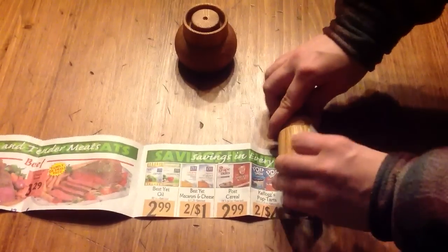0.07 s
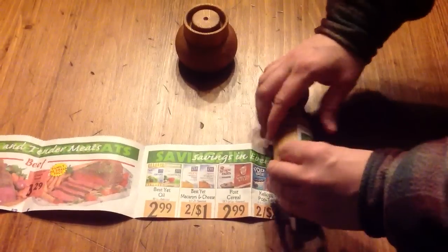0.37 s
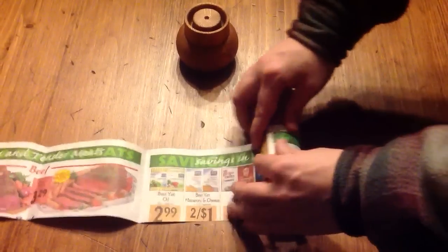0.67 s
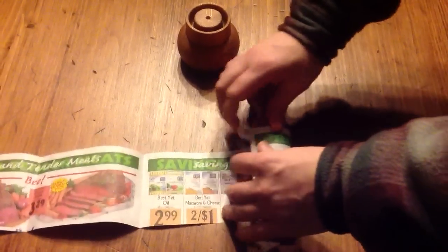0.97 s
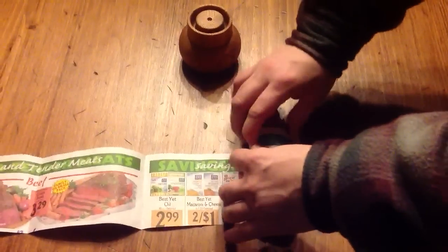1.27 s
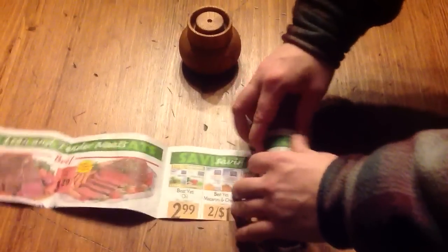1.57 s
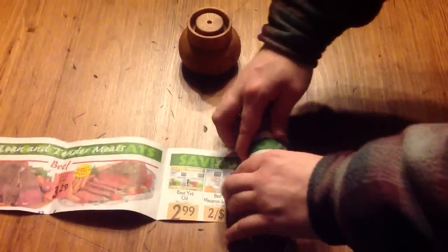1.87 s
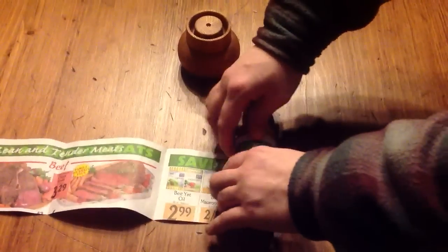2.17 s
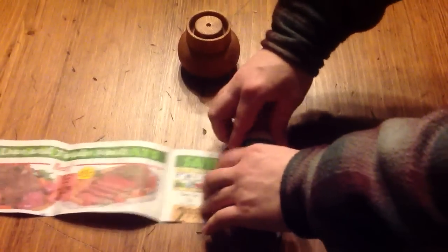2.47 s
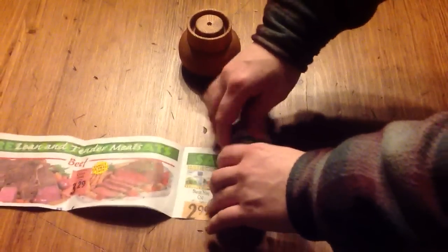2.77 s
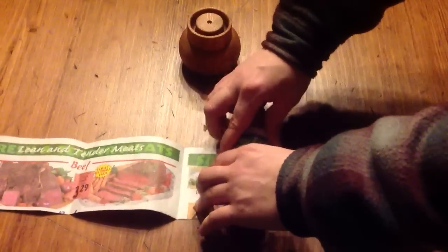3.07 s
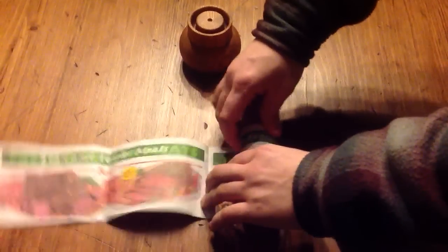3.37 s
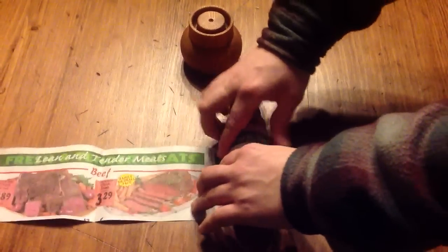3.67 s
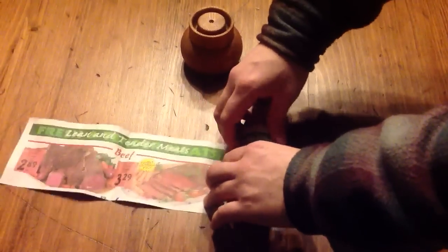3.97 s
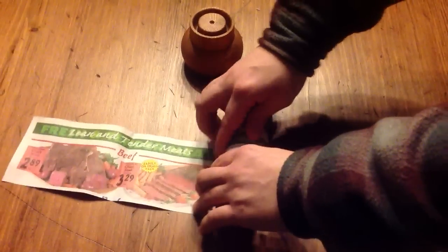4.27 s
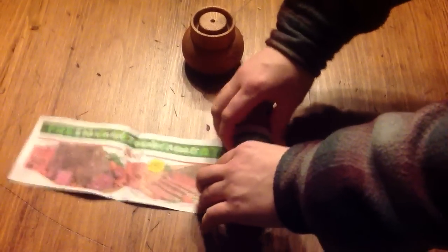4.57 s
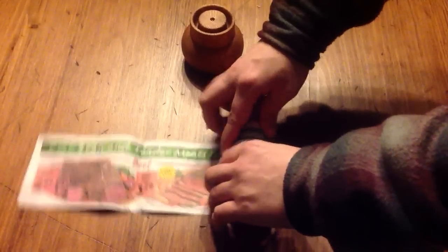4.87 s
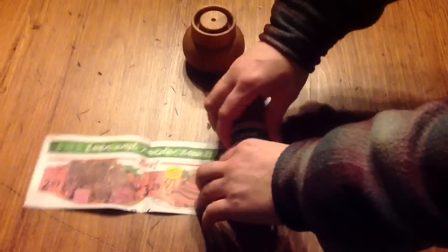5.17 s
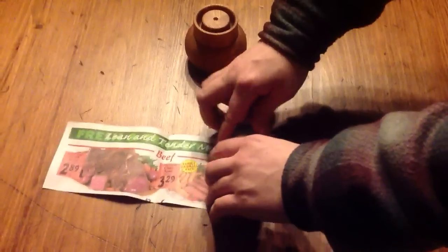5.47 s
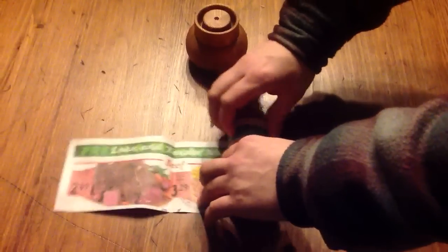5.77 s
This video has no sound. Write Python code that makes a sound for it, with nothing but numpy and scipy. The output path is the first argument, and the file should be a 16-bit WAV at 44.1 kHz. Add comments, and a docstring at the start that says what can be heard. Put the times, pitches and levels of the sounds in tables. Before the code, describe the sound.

A strip of newspaper is rolled by hand around a wooden roller on a wooden table. From the start, the paper rubs and rustles softly in short, irregular pulls, with small snaps as creases give way. At about 1.1 seconds the roller's bare end gives one sharp, dry click, followed by a brief, dull drag around 1.5 seconds. From about 2 seconds the wrapped roller bumps the table softly between rustles, with a crisper paper snap near 3.2 seconds and a quick cluster of bumps near 3.8. At about 4.1 seconds comes one hard knock, the loudest sound, and the tabletop rings for roughly half a second. Rustling, faint dragging and muffled bumps continue until the end at about 6 seconds. The room is small and quiet, with a low hiss and the faint hum of a distant appliance.

```python
"""In a quiet room, two hands roll a strip of newspaper round a wooden pot maker on a wooden table.
From the start the strip rubs and rustles in short pulls, and now and then a crease snaps.
After a second the roller's bare end taps once. Then the paper-wrapped roller drags over the table
and bumps it softly as the grip changes. At four seconds it knocks hard and makes the table ring;
the rustling, soft bumps and dragging go on to the end."""
import sys
import numpy as np
from scipy import signal
from scipy.fft import rfft, irfft
from scipy.io import wavfile
from scipy.ndimage import uniform_filter1d

SR = 44100
rng = np.random.default_rng(int(sys.argv[2]) if len(sys.argv) > 2 else 0)


def inscribe(sig):
    """Save sig as 16-bit PCM at rate SR to the path in sys.argv[1].

    A 1-D sig is mono; a 2-D sig holds one channel per row.
    Samples are clipped to [-1, 1] before scaling.
    """
    pcm = np.round(np.clip(np.atleast_2d(sig).T, -1, 1) * 32767)
    wavfile.write(sys.argv[1], SR, pcm.astype(np.int16))


N = 265041
TIME = np.arange(N) / SR
KNOCK_S, KNOCK_DB = 4.0803, -16.5  # the one hard knock

# the blur of many tones that table and room ring with: f/Hz, level/dB per Hz
RING_SPECTRUM = [(40, -30), (95, -18), (125, -18), (230, 3), (350, -6), (500, -3), (700, 4.5), (950, 1),
                 (1400, 2), (1800, -14), (2400, -12), (3200, -26), (9000, -19.5)]


def undb(db):
    """Turn decibels into a factor to multiply by."""
    return 10 ** (np.asarray(db) / 20)


def unit(x):
    """Scale a signal to an average (rms) size of 1."""
    return x / np.sqrt(np.mean(x ** 2))


def along(hz, points):
    """Read between (f/Hz, value) points, with every octave equally wide."""
    f, value = np.transpose(points)
    return np.interp(np.log(np.maximum(hz, 1)), np.log(f), value)


def colour(x, points):
    """Turn a sound's frequencies up or down to follow (f/Hz, level/dB) points."""
    hz = np.linspace(0, SR / 2, len(x) // 2 + 1)
    return irfft(rfft(x) * undb(along(hz, points)), len(x))


def band(x, hz, kind, order=2):
    """Keep the lows, the highs or a band; a higher order cuts more steeply."""
    return signal.sosfilt(signal.butter(order, np.clip(hz, 20, .45 * SR), kind, fs=SR, output="sos"), x)


def add(out, s, x):
    """Mix x into out, starting at s seconds."""
    i = int(s * SR)
    out[i:i + len(x)] += x[:len(out) - i]


def wander(rate):
    """A curve of size about 1 that glides to a new random value `rate` times a second."""
    hold = int(SR / rate)
    steps = np.repeat(rng.standard_normal(N // hold + 1), hold)
    return unit(uniform_filter1d(steps, hold)[:N])


def fade(t, t60):
    """Die away by 60 dB in t60 seconds."""
    return np.exp(-np.log(1000) * t / t60)


def room_tone(air_db=-61.6, waver=0.00308):
    """Steady air and hiss, with the faint wavering hum of a far appliance."""
    # the room's steady noise: f/Hz, level/dB per Hz
    air_spectrum = [(18, -69), (30, -47), (123, -11.5), (218, -0.5), (652, -9), (724, -10), (869, -12.5),
                    (1070, -6.5), (1250, -12), (1460, -12.5), (1580, -15), (2110, -15), (2670, -18),
                    (15300, -20.5)]
    # the appliance's tones: f/Hz, level/dB
    hum_tones = [(360.7, -73), (721.4, -79), (1200, -78.5), (1437, -75.5)]
    out = unit(colour(rng.standard_normal(N), air_spectrum)) * undb(air_db)
    for hz, db in hum_tones:
        cycles = np.cumsum(hz * (1 + waver * wander(12))) / SR
        out += undb(db) * np.sqrt(2) * np.sin(2 * np.pi * cycles)
    return out


def fibres(rate, spread_db):
    """Tiny slips of paper fibres, about `rate` a second, some larger than the rest."""
    size = undb(spread_db * np.minimum(rng.exponential(size=N), 5))
    return unit(rng.standard_normal(N) * size * (rng.random(N) < rate / SR))


def pull(start_s, length_s, speed_power=1.08, sag_db_per_s=3):
    """Loudness of one pull: it gathers speed, slackens a little, then runs out."""
    t = np.maximum(TIME - start_s, 0)
    rise_s, release_s = 0.024 + 0.27 * length_s, 0.014 + 0.35 * length_s
    speed = np.minimum(t / rise_s, 1)
    release = np.exp(-np.maximum(t - length_s, 0) / release_s)
    return speed ** speed_power * undb(-sag_db_per_s * t) * release


def rustle(rasp_db=-4.0, middle_db=-0.35, hiss_db=-2.0, catch_db=1.26):
    """The strip rubs: loose paper rasps low, tight layers hiss high, and the slide keeps catching."""
    # pulls of the hands: start/s, length/s, level/dB, tightness/dB (extra hiss; negative when loose)
    pulls = [(0, 0.045, -61, 0), (0.124, 0.066, -69.5, -7), (0.539, 0.041, -55.5, 3.5),
             (0.588, 0.13, -63, -0.5), (0.782, 0.037, -57.5, 0.5), (0.855, 0.03, -56.5, 1),
             (1.27, 0.048, -59.5, -1.5), (1.329, 0.16, -53, -2.5), (1.585, 0.021, -53, 3.5),
             (1.8, 0.19, -66.5, 1.5), (1.96, 0.073, -58.5, 2), (2.045, 0.042, -54.5, -1.5),
             (2.147, 0.028, -52.5, -3.5), (2.216, 0.05, -54.5, 1), (2.301, 0.046, -61, -3),
             (2.417, 0.027, -46.5, -3), (2.454, 0.109, -54.5, -3.5), (2.67, 0.045, -54, -1),
             (2.731, 0.092, -49.5, 2.5), (2.958, 0.068, -61, 1.5), (3.084, 0.101, -48, -2.5),
             (3.214, 0.079, -55, -4.5), (3.311, 0.045, -50, -2), (3.379, 0.062, -52.5, 1),
             (3.497, 0.084, -58, 1), (3.716, 0.16, -52, -1.5), (4.046, 0.12, -52, -0.5),
             (4.253, 0.02, -57.5, 5), (4.373, 0.18, -61, 0.5), (4.521, 0.14, -51.5, -0.5),
             (4.769, 0.018, -56, 6), (4.823, 0.076, -52, 1), (5.002, 0.019, -66.5, 13),
             (5.103, 0.2, -54.5, -1.5), (5.446, 0.081, -54.5, 0.5), (5.546, 0.07, -53.5, 1),
             (5.654, 0.11, -53, -0.5), (5.748, 0.2, -59.5, 0)]
    # the tone of rubbing paper: f/Hz, level/dB per Hz
    paper_spectrum = [(400, -10), (1200, -1), (1700, -2.5), (3400, -4), (5200, -0.5), (7000, 2),
                      (8500, -3.5), (10500, 2.5), (13000, 2.5), (15500, -9)]
    power = np.zeros((3, N))  # one row each for rasp, middle and hiss
    for s, length, db, tight_db in pulls:
        tone_db = np.array([[rasp_db - 1.2 * tight_db], [middle_db], [hiss_db + tight_db]])
        power += (undb(db + tone_db) * pull(s, length)) ** 2
    slips = colour(fibres(rate=14000, spread_db=0.5), paper_spectrum)
    # the sheet bends all the time, so each narrow band comes and goes by about 2 dB
    edges_hz = np.geomspace(450, 16000, num=34)
    spectrum, hz = rfft(slips), np.linspace(0, SR / 2, N // 2 + 1)
    sheet = sum(irfft(spectrum * ((hz >= low) & (hz < high)), N) * undb(2 * wander(18))
                for low, high in zip(edges_hz, edges_hz[1:]))
    rasp = band(sheet, 3820, "lowpass", order=4)
    middle = band(sheet, [3500, 9000], "bandpass", order=4)
    hiss = band(sheet, 8200, "highpass", order=4)
    sliding = sum(unit(part) * np.sqrt(row) for part, row in zip((rasp, middle, hiss), power))
    return sliding * undb(catch_db * wander(130))


def echo(x, wet_db, t60, top_hz=7000):
    """A small furnished room adds a short, duller tail to the sound."""
    t = TIME[:SR // 2]
    tail = band(rng.standard_normal(len(t)), top_hz, "lowpass", order=1) * fade(t, t60) * (t > .003)
    return x + undb(wet_db) * signal.fftconvolve(x, tail / np.linalg.norm(tail))[:N]


def snaps(width=1.39, crack_db=-17, decay_cycles=7.2):
    """Each crease gives way in a short burst that rings a small patch of paper."""
    # snapping creases: t/s, peak level/dB, f/Hz
    creases = [(0.295, -45.5, 4740), (0.934, -48.5, 1500), (1.093, -50, 7900), (1.614, -41.5, 1370),
               (1.725, -47, 1460), (2.008, -42.5, 1670), (2.11, -46, 2170), (2.436, -45, 4500),
               (2.776, -43.5, 1160), (3.214, -33.5, 3200), (3.322, -41, 3200), (3.427, -42, 2320),
               (5.263, -38.5, 5070)]
    out, t = np.zeros(N), TIME[:SR // 20]
    for s, db, hz in creases:
        decay_s = decay_cycles / hz
        burst = rng.standard_normal(len(t)) * np.exp(-t / decay_s) * (1 - np.exp(-2 * t / decay_s))
        patch = unit(band(burst, [hz / width, hz * width], "bandpass"))
        snap = patch + undb(crack_db) * unit(band(burst, 900, "highpass"))
        add(out, s, snap * undb(db) / np.abs(snap).max())
    return out


def tap(start_s=1.105, peak_db=-22, crack_db=-7, crack_s=0.0012, crack_hz=8000):
    """The roller's bare end gives a dry click, since the hand stops the wood from ringing on."""
    # the roller's own tones: f/Hz, level/dB, decay/s
    roller_tones = [(1040, -8.5, 0.0015), (1820, 1, 0.0011), (2070, -4, 0.00066), (4700, 3, 0.00045),
                    (6370, 3, 0.00026)]
    out, t = np.zeros(N), TIME[:SR // 20]
    ring = sum(undb(db) * np.sin(2 * np.pi * hz * t) * np.exp(-t / decay_s)
               for hz, db, decay_s in roller_tones)
    noise = unit(band(rng.standard_normal(len(t)), crack_hz, "lowpass"))
    crack = undb(crack_db) * noise * np.exp(-t / crack_s)
    rise = 1 - np.exp(-t / 0.00058)
    click = band((ring + crack) * rise, 870, "highpass", order=5)
    add(out, start_s, click * undb(peak_db) / np.abs(click).max())
    return out


def drags(low_hz=230, high_hz=750):
    """The roll drags, and its small slips stir the table into a dull rumble that swells and fades."""
    # slides over the table: t/s of the peak, half length/s, level/dB
    slides = [(1.494, 0.099, -56.5), (4.615, 0.58, -67), (5.843, 0.083, -60)]
    slips = colour(fibres(rate=900, spread_db=2.0), RING_SPECTRUM)
    rumble = unit(band(slips, [low_hz, high_hz], "bandpass"))
    swells = sum(undb(db) * np.exp(-np.minimum(np.abs(TIME - peak_s) / half_s, 10) ** 1.5)
                 for peak_s, half_s, db in slides)
    return rumble * swells


def table_ring(blur_db=2.5, place_db=1.5, crack_db=-14, crack_s=0.0023):
    """The struck table gives clear tones, a blur of many more, and a short crack."""
    # the table top's own tones: f/Hz, level/dB
    table_tones = [(145, -19), (179, -14), (219, -7), (250, -7), (272, -8), (297, -13), (373, -7),
                   (394, -11), (415, -13), (542, -10), (586, -8), (633, -9), (649, -6), (674, -10),
                   (731, 0), (778, -5), (817, -4), (895, -3), (912, -8), (951, -2), (992, -8), (1039, -10),
                   (1221, -14), (1255, -10), (1335, -12), (1395, -12), (1490, -13), (1606, -17)]
    # how long the ring lasts: f/Hz, t/s to fade by 60 dB
    ring_times = [(150, 0.53), (260, 0.55), (520, 0.45), (850, 0.52), (1500, 0.36), (4000, 0.43)]
    t = TIME[:SR]
    hz, db = np.transpose(table_tones)[:, :, None]
    strength = undb(db + place_db * rng.standard_normal(hz.shape))  # each spot struck favours other tones
    waves = np.sin(2 * np.pi * (hz * t + rng.random(hz.shape)))
    tones = np.sum(strength * waves * fade(t, along(hz, ring_times)), axis=0)
    edges_hz = 30 * 2 ** np.arange(0, 9.5, .5)  # half an octave apart
    blur = np.zeros(SR)
    for low, high in zip(edges_hz, edges_hz[1:]):
        noise = band(colour(rng.standard_normal(SR), RING_SPECTRUM), [low, high], "bandpass", order=3)
        blur += noise * fade(t, along(np.sqrt(low * high), ring_times))
    crack = band(rng.standard_normal(SR) * np.exp(-t / crack_s), [700, 5000], "bandpass")
    return unit(tones) + undb(blur_db) * unit(blur) + undb(crack_db) * unit(crack)


def blow(db, padded_hz=239, squash_hz=1815, stiffening=0.7, build_cycles=0.32):
    """The roller hits the table; more force squashes its paper padding and wakes higher tones."""
    cutoff_hz = padded_hz + squash_hz * undb(db - KNOCK_DB) ** stiffening
    # the padding takes a moment to squash, so the ring builds up
    ring = table_ring() * (1 - np.exp(-TIME[:SR] * cutoff_hz / build_cycles))
    muffled = band(ring, cutoff_hz, "lowpass", order=3)
    thinned = band(muffled, 0.16 * cutoff_hz, "highpass", order=1)
    hit = thinned * undb(db) / np.std(thinned[:SR // 30])
    return band(hit, 154, "highpass", order=4)  # the deep bass is cut from each knock


def bumps():
    """The wrapped roller bumps the table softly as the grip changes."""
    # soft blows: t/s, level/dB
    soft_blows = [(1.869, -59), (2.068, -42.5), (2.171, -56), (2.434, -39), (2.497, -43.5), (3.035, -38.5),
                  (3.200, -37), (3.299, -54.5), (3.753, -45), (3.781, -42), (3.824, -43.5), (3.871, -45),
                  (3.944, -51.5), (4.022, -50), (4.437, -41.5), (4.699, -53), (4.858, -40), (5.13, -43.5),
                  (5.157, -46), (5.328, -49.5), (5.839, -52.5), (5.993, -46.5)]
    out = np.zeros(N)
    for s, db in soft_blows:
        add(out, s, blow(db))
    return out


def hard_knock(gap_s=0.0128, step_db=7.5, edge_db=-9, edge_s=0.0018, thud_db=-8, thud_hz=142):
    """A bare edge lands with a crack and heaves the whole table top."""
    out, t = np.zeros(N), TIME[:SR // 2]
    # three overlapping layers: the knock stays loud for a moment, then dies away
    for layer in range(3):
        add(out, KNOCK_S + layer * gap_s, blow(KNOCK_DB - layer * step_db))
    edge = unit(band(rng.standard_normal(len(t)), [900, 3500], "bandpass")) * np.exp(-t / edge_s)
    thud = band(np.sin(2 * np.pi * thud_hz * t) * fade(t, t60=0.074), 126, "highpass", order=6)
    add(out, KNOCK_S + 0.00132, undb(KNOCK_DB) * (undb(edge_db) * edge + undb(thud_db) * thud))
    return out


def scene():
    """Mix paper, roller, table and room into one channel."""
    paper = echo(rustle() + snaps(), wet_db=-15, t60=0.34)
    click = echo(tap(), wet_db=-10, t60=0.3)
    table = bumps() + hard_knock() + drags()
    return (paper + click + table + room_tone())[None]


def record(dry, top_hz=15300):
    """Cut away the very highest treble."""
    return signal.sosfilt(signal.ellip(10, .2, 70, top_hz, fs=SR, output="sos"), dry)


dry = scene()
out = record(dry)
inscribe(out)
```